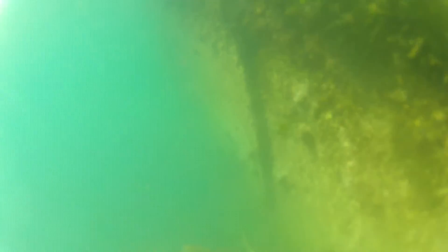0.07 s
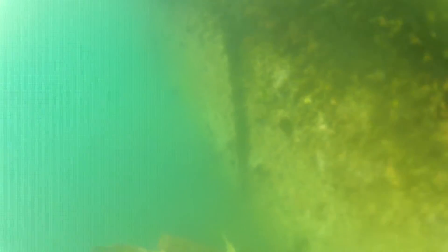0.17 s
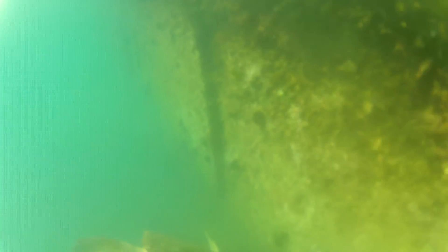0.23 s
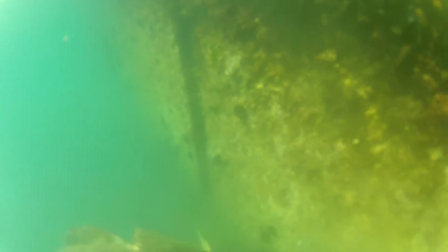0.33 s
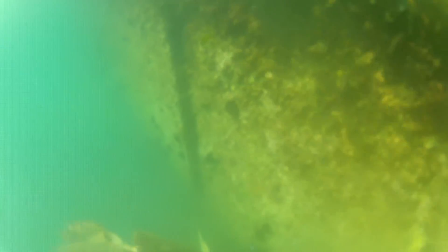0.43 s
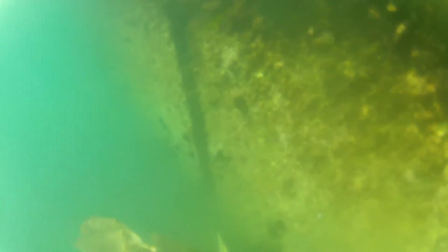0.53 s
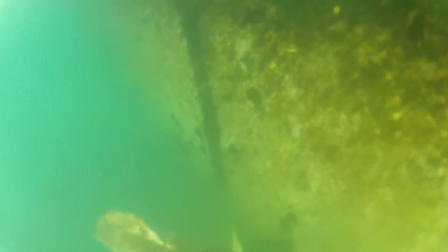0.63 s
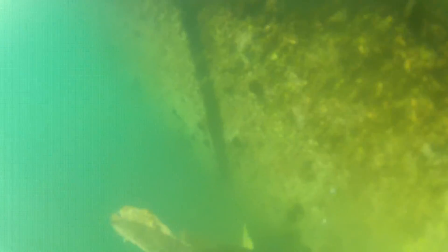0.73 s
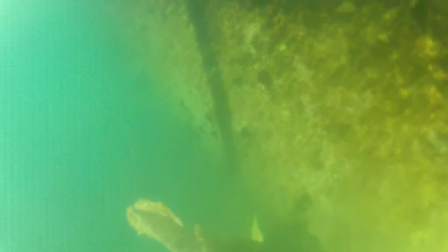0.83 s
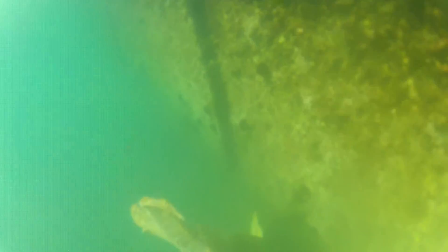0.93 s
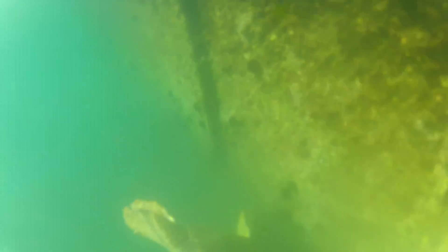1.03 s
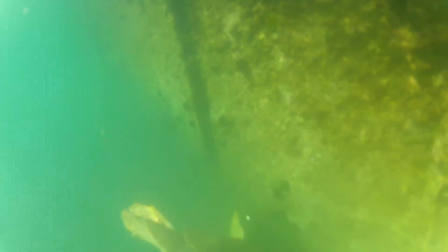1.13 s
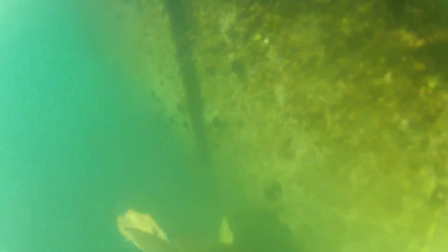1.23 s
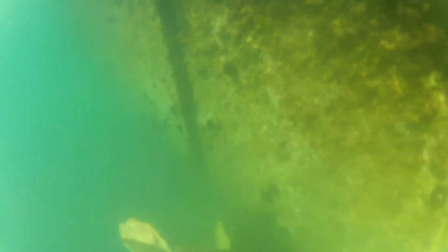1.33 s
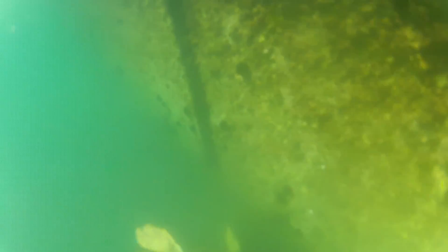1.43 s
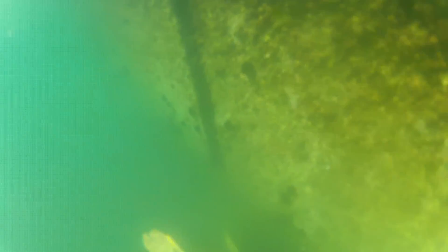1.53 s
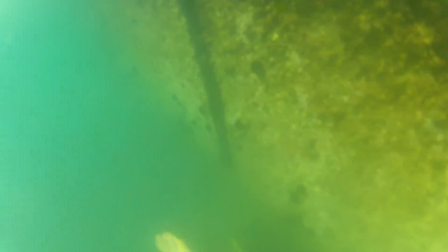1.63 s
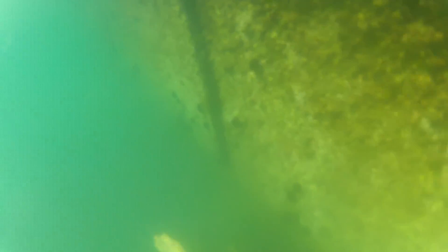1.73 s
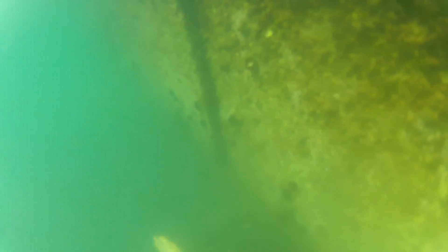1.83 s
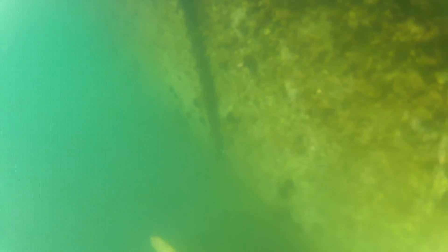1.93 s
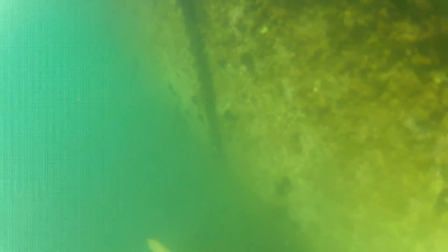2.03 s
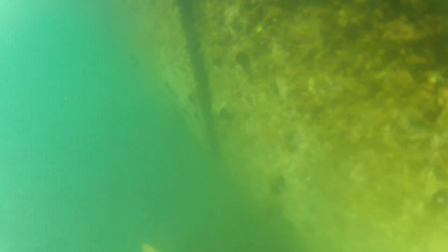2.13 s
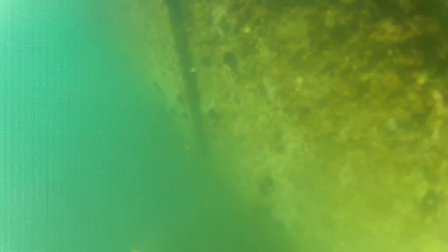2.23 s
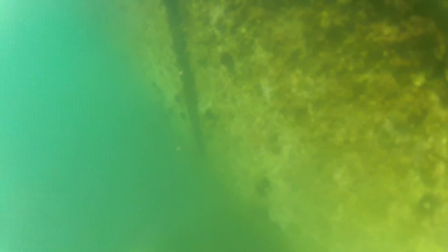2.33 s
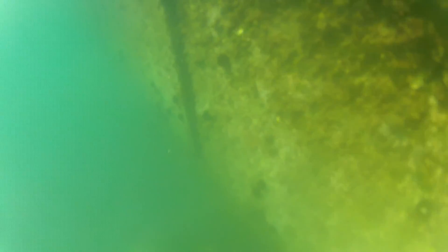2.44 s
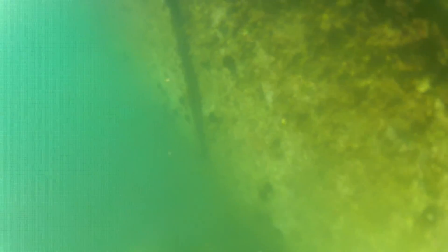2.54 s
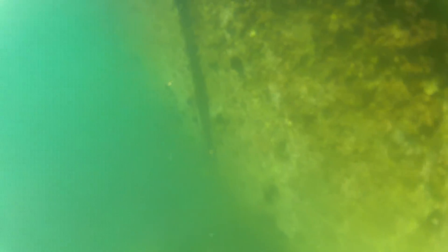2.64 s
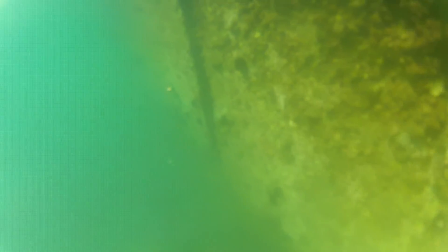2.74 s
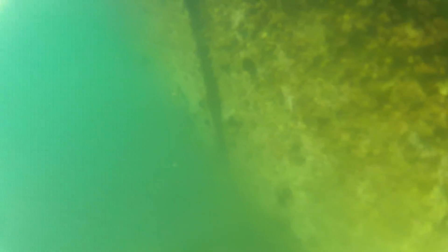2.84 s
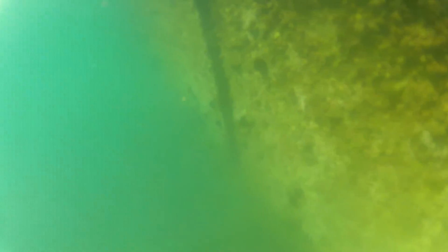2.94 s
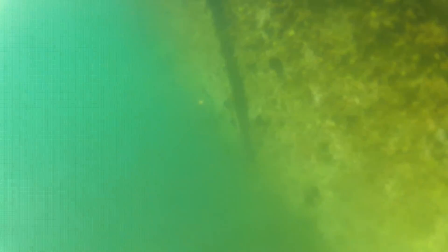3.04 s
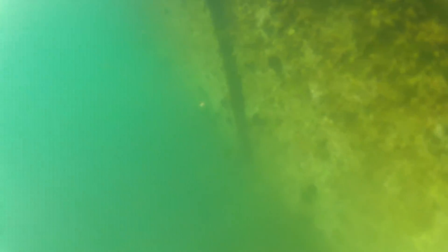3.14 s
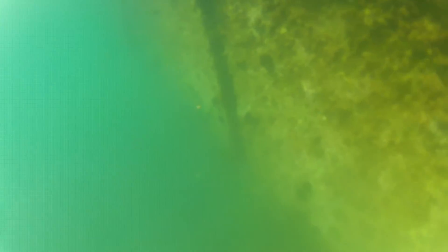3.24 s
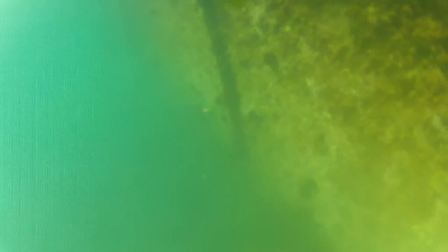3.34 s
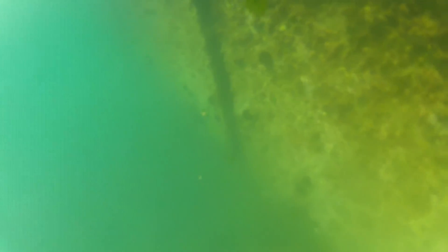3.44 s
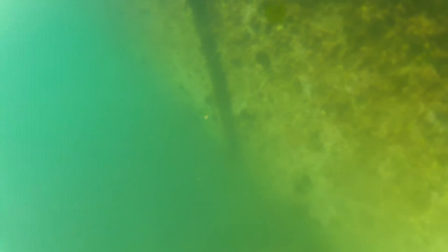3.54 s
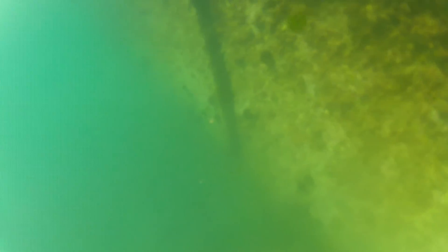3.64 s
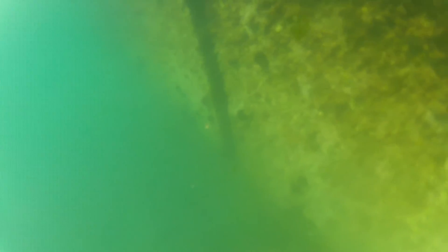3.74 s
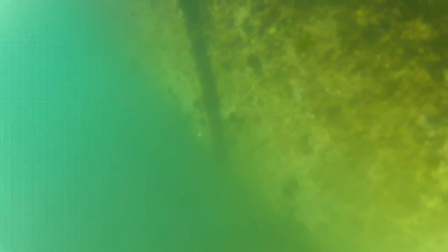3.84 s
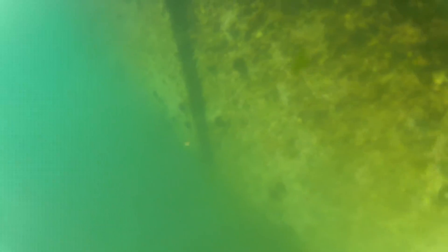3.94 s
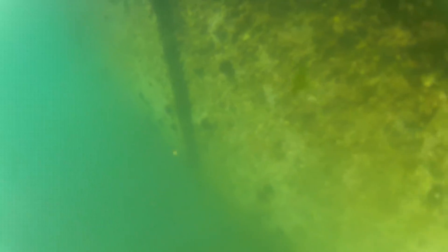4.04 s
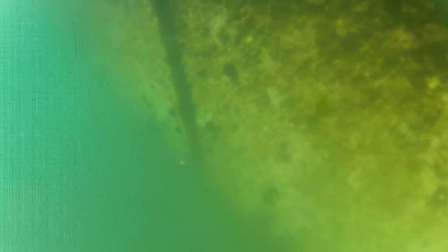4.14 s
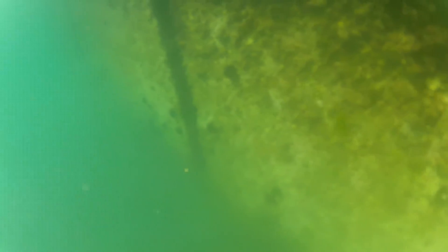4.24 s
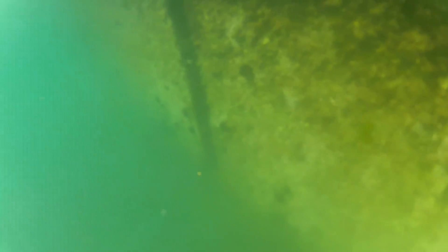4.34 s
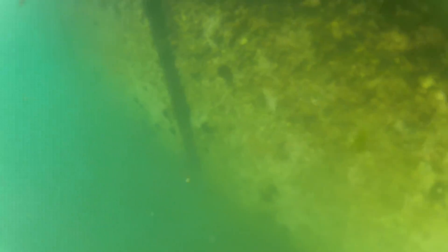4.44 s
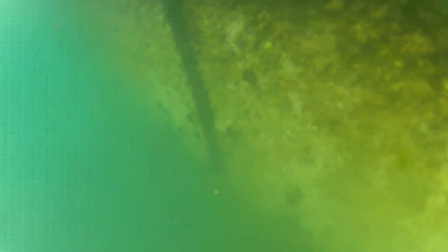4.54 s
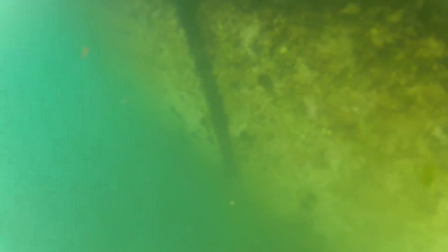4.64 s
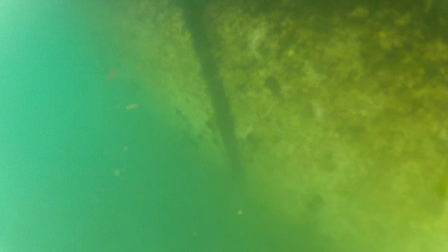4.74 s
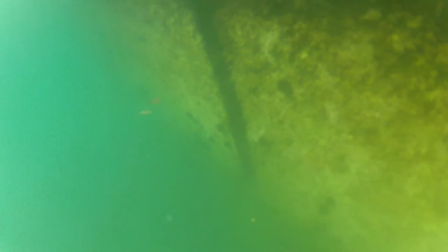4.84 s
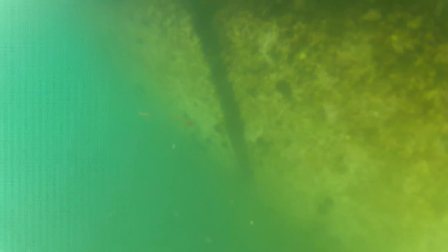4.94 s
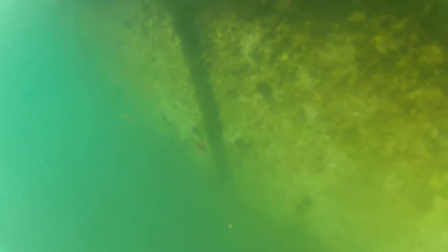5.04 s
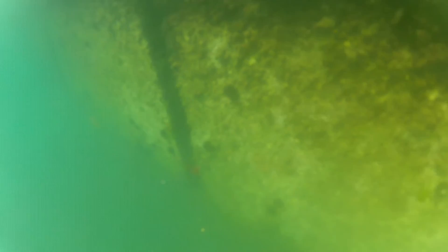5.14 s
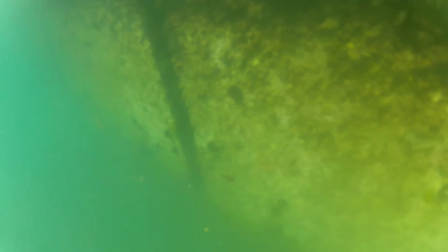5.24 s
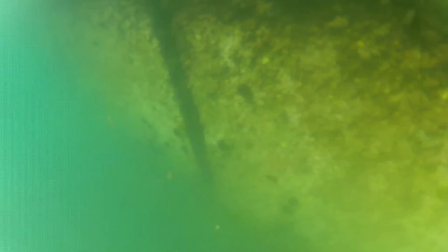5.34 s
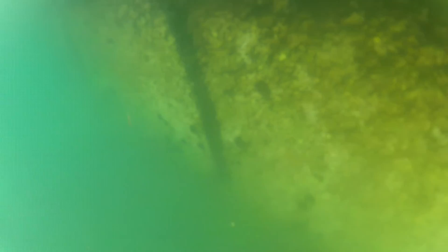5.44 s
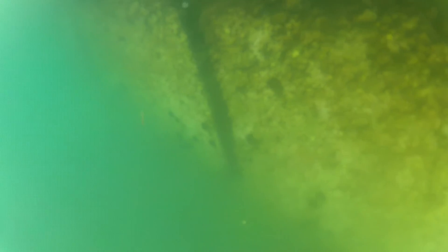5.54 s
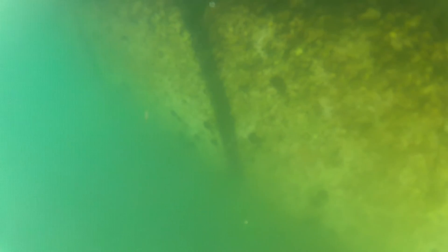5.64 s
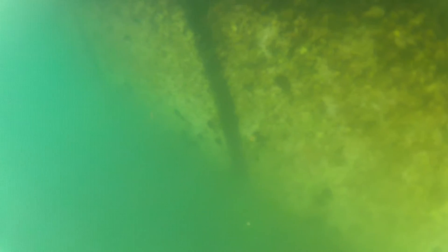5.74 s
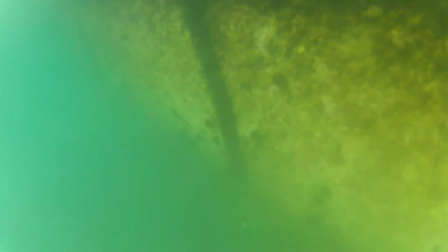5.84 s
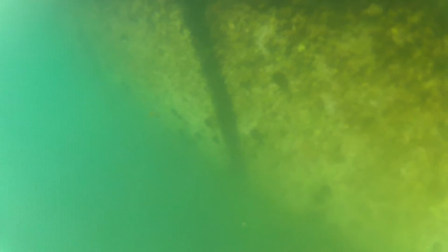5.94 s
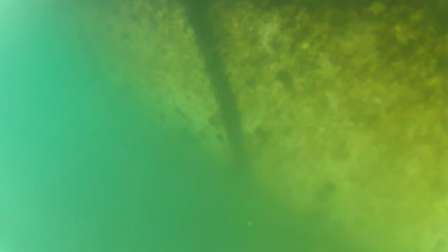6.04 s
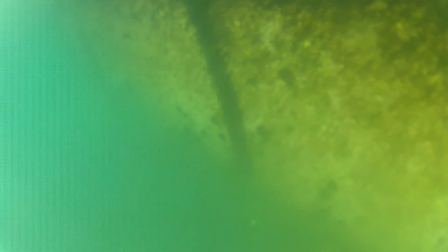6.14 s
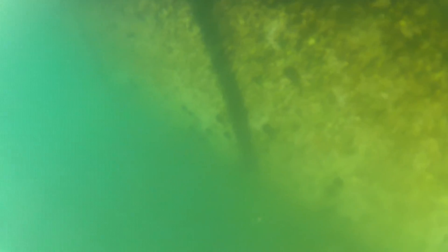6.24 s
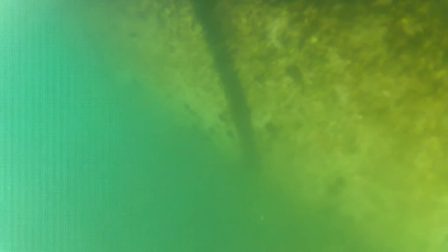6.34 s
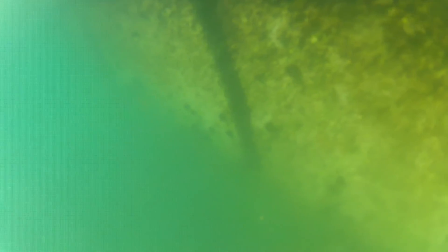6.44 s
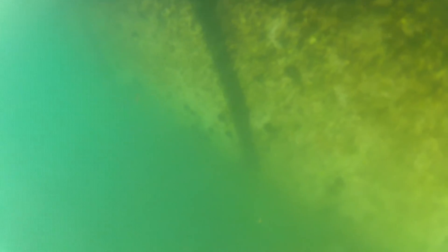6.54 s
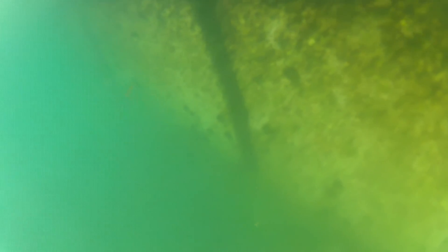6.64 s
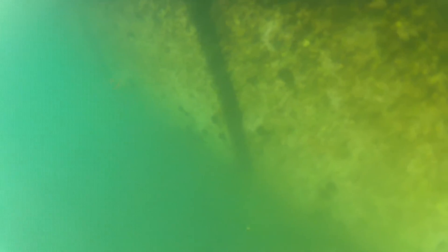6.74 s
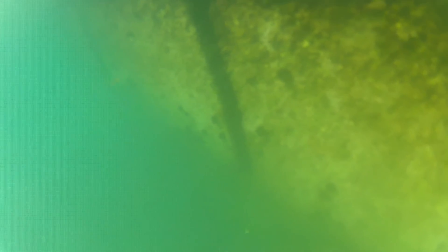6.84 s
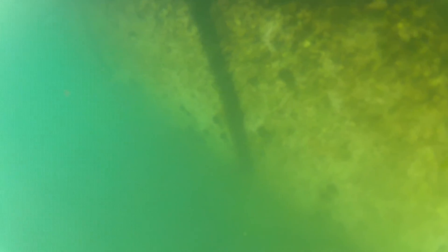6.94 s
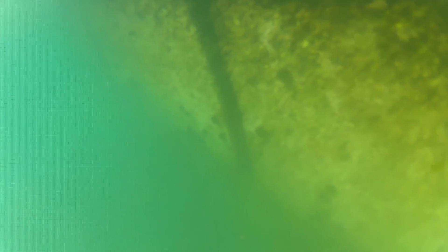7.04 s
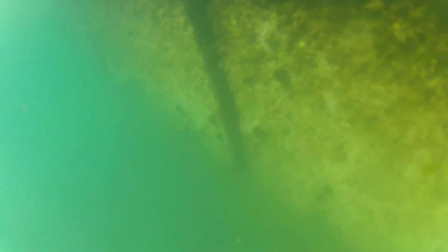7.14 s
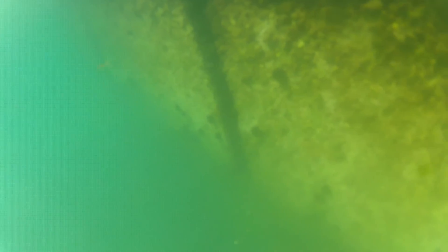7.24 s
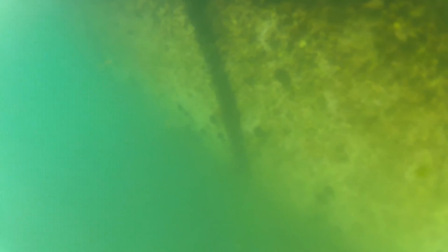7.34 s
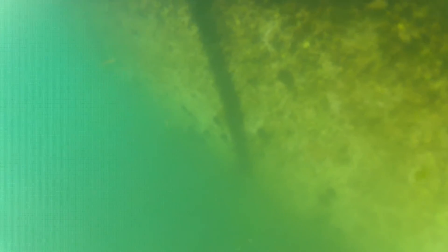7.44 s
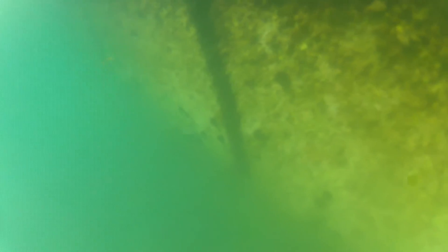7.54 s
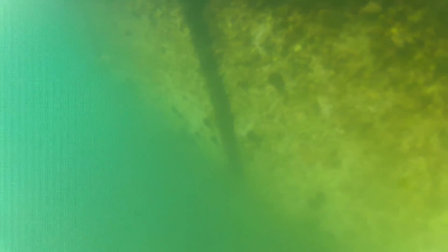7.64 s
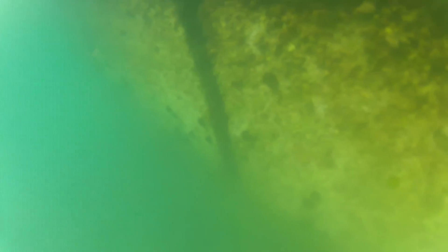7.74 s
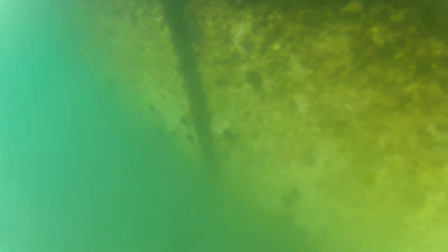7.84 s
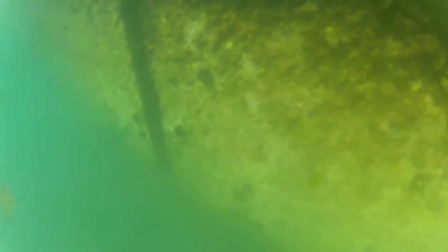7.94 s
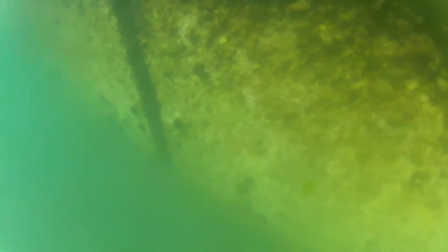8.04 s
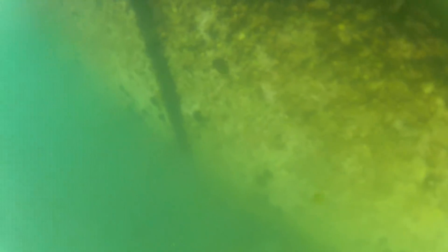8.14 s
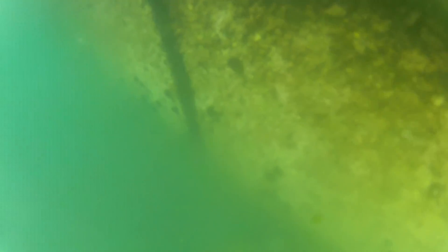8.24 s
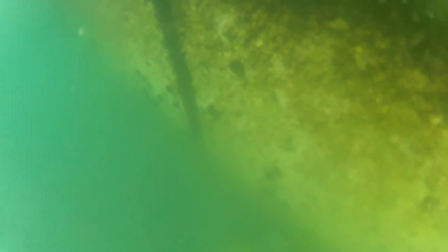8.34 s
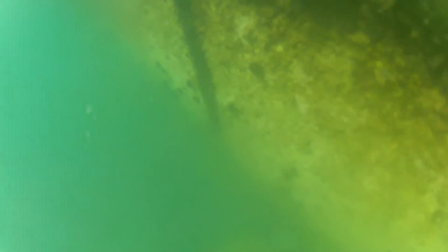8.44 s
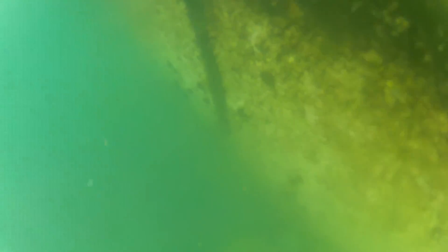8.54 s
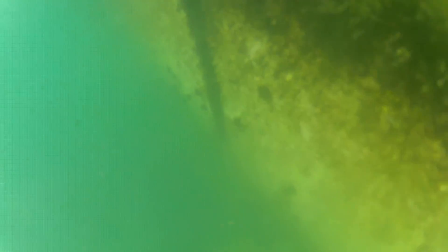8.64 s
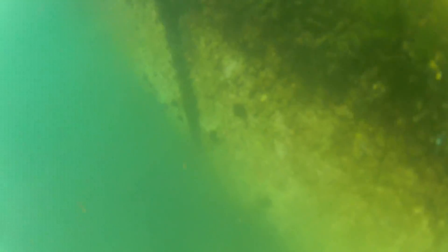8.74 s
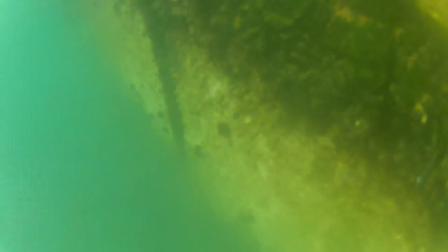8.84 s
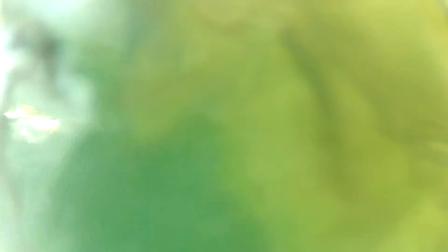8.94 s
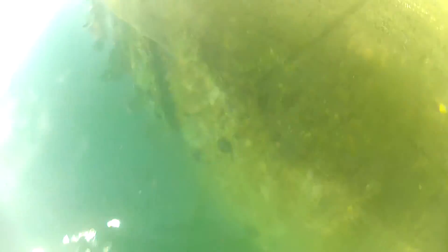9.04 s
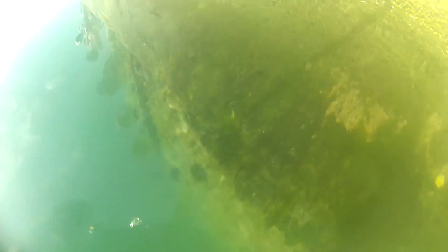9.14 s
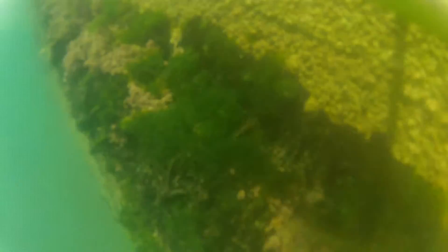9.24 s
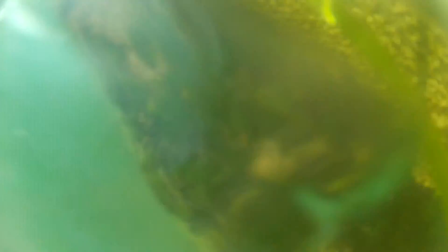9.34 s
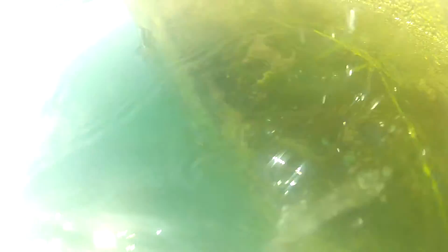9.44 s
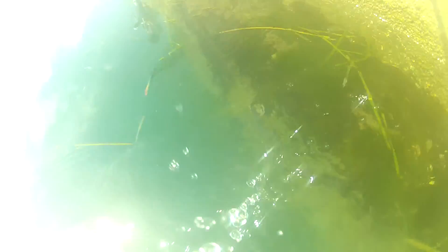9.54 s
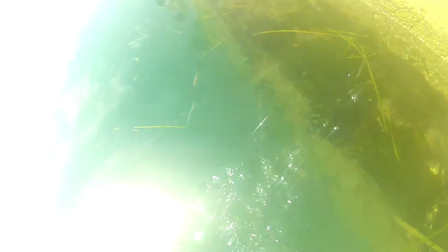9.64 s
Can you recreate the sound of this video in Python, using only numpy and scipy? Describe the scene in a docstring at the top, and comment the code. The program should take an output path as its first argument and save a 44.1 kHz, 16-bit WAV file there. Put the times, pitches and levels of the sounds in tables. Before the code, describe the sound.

Close and muffled inside a plastic housing under water: a low uneven rumble and thin hiss, with small clicks, grit-like ticks and an early short groan. Brighter sharp clicks come in clusters around three, four and nearly six seconds. The last second erupts into a far louder knock, thump, splash and bubbling froth as it breaks the surface.

```python
"""A small camera in a plastic housing drifts under water beside a rock wall.
From the start water rumbles past, the housing clicks, creaks and ticks, and pockets of air gulp; the shell
groans once at half a second. In the last second it is lifted through the surface in a splash of bubbles and froth.
Noise makes the water, struck resonances the housing, and decaying sines the air.
The converter samples slowly and holds each value, so the sound is mirrored into the treble."""
import sys
import numpy as np
from scipy.fft import rfft, irfft, next_fast_len
from scipy.io import wavfile
from scipy.ndimage import map_coordinates

SR = 44100
rng = np.random.default_rng(int(sys.argv[2]) if len(sys.argv) > 2 else 0)


def digitize_waveform(pressure):
    """Quantize a signal to 16-bit integers and store it at the path in sys.argv[1].

    Rows of a 2-D input are taken as channels; values are limited to [-1, 1].
    """
    field = np.atleast_2d(pressure).T
    bounded = np.clip(field, -1, 1)
    quanta = np.round(bounded * 32767).astype(np.int16)
    wavfile.write(sys.argv[1], SR, quanta)


N = 426888


def amp(db):
    """Decibel law: 20 dB is a factor of ten in amplitude."""
    return 10 ** (np.asarray(db) / 20)


def unit(x):
    """Normalisation by the root mean square."""
    return x / np.sqrt(np.mean(np.abs(x) ** 2) + 1e-20)


def along(points, at):
    """Interpolation of (f/Hz, value) points on a logarithmic frequency axis."""
    f, v = np.transpose(points)
    return np.interp(np.log(at + 1), np.log(f + 1), v)


def curves(rows):
    """Linear interpolation in time: one value per sample for each column after t/s."""
    s, *columns = np.transpose(rows)
    return [np.interp(np.arange(N) / SR, s, c) for c in columns]


def wobble(rate):
    """Band-limited random fluctuation: a smooth curve through rate knots a second."""
    knots = rng.standard_normal(int(N * rate / SR) + 4)
    return map_coordinates(knots, [np.arange(N) * rate / SR])


def filtered(x, response):
    """Linear filtering: the spectrum is multiplied by a complex response of frequency."""
    m = next_fast_len(N + SR // 2)
    f = np.fft.rfftfreq(m, 1 / SR)
    return irfft(rfft(x, m) * response(f), m)[..., :N]


def noise(spectrum):
    """Spectral shaping: coloured noise of rms 1."""
    return unit(filtered(rng.standard_normal(N), lambda f: amp(along(spectrum, f))))


def ringing(modes):
    """Modal superposition: causal resonances that pass white noise at unchanged power."""
    def response(f):
        h = 0
        for k, (centre, width, db) in enumerate(modes):
            resonance = 1j * f * width / (centre ** 2 - f ** 2 + 1j * f * width)
            h = h + (-1) ** k * amp(db) * resonance
        above = f / (1.68 * modes[-1][0])  # the damped plastic passes little above its highest mode
        h = h / (1 - above ** 2 + 1.2j * above) ** 2
        return unit(abs(h)) * np.exp(1j * np.angle(h))
    return response


def chirps(s, db, hz, rise, t60, glide, length):
    """Damped free oscillation: a sine per row, its pitch climbing by the share glide within t60."""
    t = np.arange(round(length * SR)) / SR
    s, db, hz, rise, t60 = (np.asarray(c)[:, None] for c in (s, db, hz, rise, t60))
    swell = np.sin(np.pi / 2 * np.clip(t / rise, 0, 1)) ** 2
    decay = amp(db - 60 * np.maximum(t - rise, 0) / t60)
    tone = decay * swell * np.sin(2 * np.pi * hz * t * (1 + glide * t / t60 / 2))
    at = np.round(s * SR).astype(int) + np.arange(len(t))
    return np.bincount(at.ravel(), tone.ravel(), N + SR)[:N]


def swells(rows):
    """Power summation of bell-shaped gains, each 23.7 dB under its peak one rise before and one fall after."""
    t = np.arange(N) / SR
    power = 0
    for s, db, rise, fall in rows:
        side = np.where(t < s, rise, fall)
        power = power + amp(2 * db - 47.4 * ((t - s) / side) ** 2)
    return np.sqrt(power)


# Passing water, mean levels: t/s, rumble level/dB, wash level/dB
WATER_FLOW = [(0.0, -41, -60), (0.35, -44.5, -58.5), (0.57, -46, -56.5), (0.91, -48.5, -60.5),
              (1.51, -47.5, -59), (1.86, -52.5, -61.5), (2.13, -53, -61), (2.26, -46.5, -59.5),
              (2.56, -59, -60), (2.91, -49.5, -59.5), (3.18, -57.5, -59.5), (4.31, -48.5, -60.5),
              (5.69, -52.5, -58), (5.85, -60.5, -61.5), (6.52, -53, -60.5), (7.06, -60.5, -60.5),
              (7.84, -54, -59), (8.17, -43.5, -57.5), (8.52, -42, -59.5), (8.74, -41.5, -57),
              (8.84, -35.5, -53), (9.27, -43.5, -57), (9.41, -45, -38.5), (9.68, -28.5, -51.5)]
# Relative noise spectra of the eddies' rumble, their wash and the far hiss: f/Hz, level/dB
RUMBLE_SPECTRUM = [(12, -34), (20, 4), (68, 0.5), (77, -15), (87, -22), (130, -22), (170, -65.5),
                   (290, -120)]
WASH_SPECTRUM = [(53, -24), (90, 1.5), (129, -0.5), (312, -6.5), (525, -16.5), (707, -18), (900, -30),
                 (1170, -65.5), (1980, -120)]
HISS_SPECTRUM = [(350, -14.5), (600, 3), (706, -3), (1210, -6), (1960, -9), (2380, -5), (2990, -8),
                 (5060, -12), (5900, -19), (7670, -51), (13000, -120)]
HISS_DB = -67.5  # mean level of the far hiss of the water


def water():
    """Turbulence noise: eddies rumble and wash on the housing in uneven lumps over a smooth hiss."""
    rumble_db, wash_db = curves(WATER_FLOW)
    rumble = amp(rumble_db + 2.2 * wobble(9)) * noise(RUMBLE_SPECTRUM)
    wash = amp(wash_db + 0.5 * wobble(25) + 0.53 * wobble(36)) * noise(WASH_SPECTRUM)
    hiss = amp(HISS_DB + 0.78 * wobble(30) + 1.0 * wobble(3.03)) * noise(HISS_SPECTRUM)
    return rumble + wash + hiss


# Modes of the whole shell: f/Hz, width/Hz, relative level/dB
SHELL_MODES = [(260.4, 46, 5), (464, 24, -7), (695, 18, -1.5), (1200, 91, -38), (1652, 46, -10),
               (2300, 100, -17), (3580, 210, -50.5)]
# The shell rubs on its mount: peak t/s, level/dB, rise/s, fall/s
RUB_SWELLS = [(.02, -62, 0.056, 0.04), (.24, -60.5, 0.27, 0.39), (.495, -41.5, 0.042, 0.053),
              (.74, -62.5, 0.073, 0.047), (2.5, -68.5, 0.13, 0.29), (3.2, -64.5, 0.27, 0.35),
              (3.878, -50, .015, 0.024), (4.548, -51, 0.022, 0.028), (4.9, -64, .04, 0.046),
              (5.2, -63, .12, 0.048), (7.98, -57, 0.059, 0.11), (8.07, -45, 0.061, 0.085),
              (9.3, -56, 0.067, 0.11), (9.63, -43.5, 0.079, 0.055), (8.78, -56, 0.05, .1)]
RUB_REST_DB = -70.5  # steady rubbing under the swells
# the two lowest shell modes sing once; lists follow the modes
GROAN_S, GROAN_DB, GROAN_RISE_S, GROAN_T60_S = .493, [-24, -36], [0.031, 0.0055], [0.1, 0.16]


def rubbing():
    """Stick-slip friction: uneven slips ring in the shell modes; once it catches and the shell groans."""
    slips = unit(amp(4 * wobble(60) + 1.5 * wobble(18)) * rng.standard_normal(N))
    friction = (swells(RUB_SWELLS) + amp(RUB_REST_DB)) * slips
    groan_hz = [mode[0] for mode in SHELL_MODES[:2]]
    groan = chirps([GROAN_S] * 2, GROAN_DB, groan_hz, GROAN_RISE_S, GROAN_T60_S, glide=0.019, length=.2)
    return filtered(friction, ringing(SHELL_MODES)) + groan


# The clearest faint ticks, before the housing rings: t/s, level/dB
CLEAR_TICKS = [(0.5556, -50), (0.8684, -59), (1.0455, -44.5), (1.0908, -51), (1.2336, -52), (1.3728, -56),
               (1.458, -56), (1.6342, -54), (1.679, -52.5), (1.7187, -55), (1.7898, -53), (2.059, -42.5),
               (2.1274, -43.5), (2.5376, -50), (2.947, -43), (3.008, -43), (3.5734, -48), (4.0894, -47.5),
               (4.151, -49.5), (4.9921, -48), (5.1367, -45), (5.3138, -44), (5.3666, -46.5),
               (6.0237, -53.5), (6.1185, -49.5), (6.4986, -49), (6.6273, -42), (6.8843, -52.5),
               (7.1134, -47), (7.17, -53), (7.4135, -55), (7.6904, -50), (7.7702, -52), (7.7887, -51.5),
               (7.9004, -41), (7.932, -44.5), (8.024, -48.5), (8.2084, -54), (8.9238, -38), (8.9745, -29),
               (9.1714, -56), (9.5284, -44)]
# Longer scrapes across the latch, before the housing rings: t/s, level/dB, t60/s
LATCH_SCRAPES = [(2.291, -42, 0.035), (2.312, -41, .09), (2.571, -49.5, 0.027), (3.661, -48, 0.045),
                 (6.307, -56, .04), (6.323, -52, 0.14), (8.968, -35, 0.026), (8.997, -40, 0.039),
                 (9.017, -11, 0.019), (9.033, -29, 0.034), (9.074, -28.5, 0.043), (9.106, -34.5, .03),
                 (9.125, -35, 0.047), (9.324, -33, .08), (9.516, -30.5, 0.034)]
STRAY_DB, STRAY_SPREAD_DB = -62, 2.4  # the many weak ticks: base level, spread per e-fold of random size
TICK_T60_S = 0.012  # median decay of a tick


def ticks(count=320):
    """Impulse excitation: ticks and scrapes, as of grit, clear and weak, ring mostly the latch."""
    when, size = rng.random((count, 2)).T
    clear_s, clear_db = np.transpose(CLEAR_TICKS)
    scrape_s, scrape_db, scrape_t60 = np.transpose(LATCH_SCRAPES)
    tick_t60 = TICK_T60_S * np.exp(0.37 * rng.standard_normal(len(clear_s) + count))
    t60 = np.append(scrape_t60, tick_t60)[:, None]
    s = np.concatenate([scrape_s, clear_s, when * N / SR])
    stray_db = STRAY_DB - STRAY_SPREAD_DB * np.log(size + .03)
    db = np.concatenate([scrape_db, clear_db, stray_db])

    t = np.arange(SR // 10) / SR
    envelope = amp(db[:, None] - 60 * t / t60) * (1 - np.exp(-t / (0.021 * t60)))
    taps = envelope * rng.standard_normal((len(s), len(t)))
    at = np.round(s * SR).astype(int)[:, None] + np.arange(len(t))
    side_db = 4.1 * rng.standard_normal((len(s), 1))  # nearer the door or nearer the buttons
    parts = ((0, LATCH_MODES + BUTTON_MODES[:1]), (-18 - side_db, DOOR_MODES), (-15 + side_db, BUTTON_MODES))
    out = np.zeros(N)
    for part_db, modes in parts:
        push = np.bincount(at.ravel(), (amp(part_db) * taps).ravel(), N + SR)[:N]
        out = out + filtered(push, ringing(modes))
    return out


# Housing modes, from the broad wall up to the small parts: f/Hz, width/Hz, relative level/dB
WALL_MODES = [(393, 180, -10.5), (700, 68, -2.5)]
DOOR_MODES = [(1106, 103, 0.5), (1310, 150, 4.6), (1860, 156, 6.2)]
LATCH_MODES = [(2220, 485, 0.3), (2524, 550, 0), (2933, 236, -1.5)]
BUTTON_MODES = [(3550, 176, -4.5), (3850, 320, 11), (4380, 750, 11), (4820, 1150, 7.5)]
# Clicks and slaps, nominal: t/s, blow level/dB, wall level/dB, brightness/dB, contact time scale/s
HOUSING_CLICKS = [(0.0065, -62, -52, -12, 0.0033), (0.0599, -55, -41, -17, 0.0014),
                  (0.1923, -59.5, -40, -13, 0.003), (0.262, -70, -58, -17, 0.0032),
                  (0.3122, -49.5, -38.5, -30.5, 0.0028), (0.3337, -52, -56, -13, 0.0043),
                  (0.3697, -55, -42.5, -24, 0.0022), (0.4073, -46, -50, -13, 0.0018),
                  (0.475, -65, -42, -20, 0.0025), (0.4996, -47, -40.5, -15.5, 0.0057),
                  (0.6, -56.5, -60, -24, 0.0028), (0.6377, -72, -50, -5, 0.0018),
                  (0.715, -63, -68, -14, 0.016), (0.7555, -58.5, -50, -22, 0.0036),
                  (1.0102, -57.5, -58, -5, 0.0038), (1.9106, -85, -55, 0, 0.0026),
                  (2.4734, -55.5, -49.5, -21, 0.0028), (2.5035, -45.5, -39.5, -4.5, 0.0013),
                  (2.6048, -69, -50, -7, 0.0045), (2.656, -51.5, -52, 1.5, 0.0022),
                  (2.7377, -56, -49, -1, 0.0053), (2.7551, -52.5, -32, 1, 0.002),
                  (2.806, -52, -40, 1.5, 0.0047), (2.8416, -63, -47, 6, 0.0021),
                  (2.91, -63, -47, 2, 0.0047), (2.9538, -48, -39, -1, 0.0057),
                  (2.9824, -37.5, -33.5, -2, 0.0014), (3.0265, -52.5, -54, 8, 0.001),
                  (3.0724, -55, -49, -1, 0.0021), (3.0899, -30.5, -27.5, -0.5, 0.0027),
                  (3.1304, -51, -50, 0, 0.0023), (3.1425, -30, -23.5, 3, 0.0022),
                  (3.873, -56, -40.5, -11, 0.0035), (4.2408, -30, -26, 2.5, 0.0019),
                  (4.2862, -52.5, -39, 0, 0.0038), (4.3176, -57, -53, 14, 0.012),
                  (4.3307, -29.5, -23.5, 0.5, 0.0016), (4.501, -66.5, -37, -35, 0.0018),
                  (4.518, -60.5, -36, -27, 0.0025), (4.542, -60.5, -50, -16, 0.0067),
                  (5.038, -59.5, -42.5, 1, 0.0021), (5.442, -76, -46, 16, 0.0021),
                  (5.4665, -48.5, -45.5, 7, 0.0019), (5.5123, -68, -47, 10, 0.0016),
                  (5.5437, -44.5, -36.5, 2.5, 0.0017), (5.605, -50, -33.5, 8, 0.0021),
                  (5.6994, -34.5, -28.5, 4, 0.0014), (5.7161, -41, -36.5, 7.5, 0.0057),
                  (5.7339, -30.5, -39, -4.5, 0.0064), (5.7419, -36, -25.5, 6.5, 0.002),
                  (5.8083, -68, -50.5, 3, 0.003), (7.4313, -65, -52.5, 1, 0.0036),
                  (7.496, -58, -53, -1, 0.0029), (7.633, -32, -30, 2, 0.0031), (7.669, -59, -44, 9, 0.0037),
                  (7.9566, -64, -55, -19, 0.0029), (7.9989, -61, -58, -16, 0.0025),
                  (8.0531, -61, -47, -22, 0.0091), (8.082, -67, -48, -16, 0.0029),
                  (8.2666, -57, -59, -2, 0.0031), (8.7093, -51, -45, -1.5, 0.0037),
                  (8.783, -37.5, -34, -9.5, 0.0018), (8.8068, -51.5, -48, 16, 0.0013),
                  (8.8266, -61.5, -61, 9, 0.0028), (8.849, -56, -55, 7, 0.012),
                  (8.866, -45, -41.5, -20, 0.00075), (8.9108, -54, -53, 3, 0.0031),
                  (8.9346, -31, -39, -10, 0.0017), (9.05, -28, -42, -5, 0.0014),
                  (9.0698, -27, -33, -4, 0.0016), (9.1113, -31.5, -59, -2, 0.0016),
                  (9.1635, -42.5, -63, 4.5, 0.00087), (9.2528, -30, -30.5, -11, 0.0027),
                  (9.288, -36, -49, -10, 0.0028), (9.2996, -24, -29, -3.5, 0.0014),
                  (9.3059, -19.5, -31, 11.5, 0.00073), (9.3093, -18.5, -26, 17, 0.00056),
                  (9.355, -30, -49, -4, 0.0035), (9.3988, -32, -29, -13, 0.0018),
                  (9.407, -45, -27, -7, 0.0015), (9.4324, -18.5, -39, -2, 0.002),
                  (9.4573, -27, -49, -18, 0.0014), (9.4705, -24.5, -46, -19.5, 0.001),
                  (9.4733, -17.5, -55, -6.5, 0.0056), (9.4823, -26, -53, -10, 0.0035),
                  (9.6188, -39, -58, -24, 0.014)]
LATCH_DB, DOOR_DB, BUTTONS_DB = -0.5, -6, -2  # each part against the blow level, at brightness 0
DOOR_DULLS, BUTTONS_BRIGHTEN = 0.66, 1  # share of the brightness that the door loses and the buttons gain
RATTLE_DB, RATTLE_T60_S = -17, 0.13  # ragged rattle after the blow


def housing():
    """Impact and modal response: a short rough push and ragged rattle shake each part at its own strength."""
    t = np.arange(SR // 8) / SR
    s, level_db, wall_db, bright_db, contact = (c[:, None] for c in np.transpose(HOUSING_CLICKS))
    latch_db = level_db + LATCH_DB
    door_db = level_db + DOOR_DB - DOOR_DULLS * bright_db
    buttons_db = level_db + BUTTONS_DB + BUTTONS_BRIGHTEN * bright_db

    u = t / np.clip(contact, .0007, .03)
    blow = u * np.exp(1 - 1.439 * u)
    knots = rng.standard_normal((len(s), 40))
    where = np.broadcast_arrays(np.arange(len(s))[:, None], t * 300)  # 300 knots a second
    ragged = map_coordinates(knots, where, order=1)
    rattle = amp(RATTLE_DB - 60 * t / RATTLE_T60_S + 3.3 * ragged) * (1 - np.exp(-u))
    force = blow + rattle
    rough = rng.standard_normal(force.shape)

    at = np.round((s - .0012) * SR).astype(int) + np.arange(len(t))
    f = np.fft.rfftfreq(2 * len(t), 1 / SR)
    out = np.zeros(N + SR)
    parts = ((latch_db, LATCH_MODES, 50), (wall_db, WALL_MODES, 0),
             (door_db, DOOR_MODES, 50), (buttons_db, BUTTON_MODES, 50))
    for db, modes, lag in parts:  # lag in samples: the wall gives first
        ring = irfft(rfft(force * rough, 2 * len(t)) * ringing(modes)(f))[:, :len(t)]
        # each ring carries the energy of its force envelope
        ring = ring * np.linalg.norm(force, axis=1, keepdims=True) / np.linalg.norm(ring, axis=1, keepdims=True)
        out = out + np.bincount(at.ravel() + lag, (amp(db) * ring).ravel(), N + SR)
    return out[:N]


# Gushes of froth over the housing: peak t/s, level/dB, rise/s, fall/s
FROTH_GUSHES = [(8.85, -62.5, .15, 0.28), (9.0, -59, 0.083, 0.18), (9.14, -57, 0.054, 0.018),
                (9.32, -30.5, 0.022, 0.05), (9.37, -49, .04, 0.033), (9.41, -33, .02, 0.023),
                (9.44, -38.5, .03, 0.026), (9.478, -25.5, 0.016, 0.018), (9.57, -50.5, .06, 0.13),
                (9.635, -42, 0.056, 0.048), (9.67, -37.5, 0.035, .04)]


def froth(count=1500):
    """Superposition of many bubble oscillations: a crowd of small short-lived bubbles over a thin rush."""
    start = FROTH_GUSHES[0][0] - 2 * FROTH_GUSHES[0][2]
    when, size = rng.random((count, 2)).T
    s = start + when * (N / SR - start)
    db = -4.5 * np.log(size + 0.005)
    hz = np.clip(1700 * np.exp(.4 * rng.standard_normal(count)), 700, 3300)
    crowd = chirps(s, db, hz, 2.0 / hz, 16 / hz, glide=0.45, length=.03)
    crowd = crowd / np.std(crowd[round(start * SR):])
    # relative spectrum: f/Hz, level/dB
    rush = noise([(500, -35.0), (900, 23), (2400, 6.5), (2900, 4), (4000, 9), (4500, -30), (5800, -27.0)])
    return swells(FROTH_GUSHES) * (crowd + amp(1.5 + 2.2 * wobble(70)) * rush)


# Air pockets and bubbles that ring: start t/s, nominal peak level/dB, starting f/Hz, t60/s
AIR_BUBBLES = [(0.059, -35.5, 135, 0.036), (0.635, -35.5, 254, 0.042), (.662, -42.5, 270, 0.12),
               (3.874, -41.5, 143, 0.13), (4.499, -28.5, 235, .053), (4.503, -31, 91.5, 0.078),
               (4.519, -31, 253, 0.045), (4.528, -36.5, 270, 0.081), (4.881, -42.5, 125, 0.093),
               (7.965, -35, 138, 0.045), (8.083, -37, 110, 0.12), (8.865, -35, 1500, 0.018),
               (8.912, -34.5, 1840, 0.018), (9.013, -3.5, 4220, 0.01), (9.014, -11.5, 988, 0.027),
               (9.018, 1, 2210, 0.012), (9.044, -24, 1430, 0.013), (9.052, -18.5, 5340, 0.0057),
               (9.055, -20, 1480, 0.016), (9.2572, -7.5, 146, 0.092), (9.26, 1, 66, .11),
               (9.266, -13, 296, 0.045), (9.274, -24.5, 49.8, 0.52), (9.31, 5, 3660, 0.0062),
               (9.31, -0.5, 2130, 0.0081), (9.309, -7.5, 179, 0.019), (9.325, -13, 2930, .021),
               (9.329, -14, 3830, 0.015), (9.33, -7, 2570, .0083), (9.337, -6, 2470, 0.018),
               (9.342, -7.5, 2800, 0.0096), (9.34, -18.5, 1194, 0.047), (9.357, -13.5, 4000, 0.01),
               (9.368, -14, 972, 0.054), (9.389, -33, 1830, .015), (9.399, -14.5, 1900, .024),
               (9.403, -21.5, 3470, .013), (9.41, -21, 4800, .0066), (9.426, -8.5, 1310, 0.026),
               (9.435, -9, 1090, 0.024), (9.459, -12, 1305, 0.027), (9.468, -20, 1240, .021),
               (9.469, -8.5, 2747, 0.046), (9.484, -18, 5570, 0.004), (9.485, -2.5, 3490, 0.01),
               (9.491, -19, 3800, 0.0091), (9.516, -25.5, 2080, 0.02), (9.54, -15.5, 147, 0.017),
               (9.579, -27, 131, 0.049), (9.619, -26.5, 282, 0.18), (9.664, -27.5, 2020, .041)]
RISE_1K_S, RISE_POWER = 0.0013, 0.41  # a bubble's attack at 1 kHz; larger, lower ones start more slowly


def bubbles():
    """Volume resonance: air pockets ring at a slightly climbing pitch; churning water roughens small ones."""
    s, db, hz, t60 = np.transpose(AIR_BUBBLES)
    rise = RISE_1K_S * (1000 / hz) ** RISE_POWER

    def tones(pick):
        chosen = [c[pick] for c in (s, db, hz, rise, t60)]
        return chirps(*chosen, glide=0.037, length=.2)

    return tones(hz < 500) + amp(1.7 * wobble(450)) * tones(hz >= 500)


def scene():
    """Linear superposition of all the sources, as one channel."""
    return (water() + rubbing() + ticks() + housing() + froth() + bubbles())[None]


HOLD_HZ, TOP_HZ = 12000, 16400  # rate of the slow sampling; upper band limit


def record(dry):
    """Sampling and zero-order hold: anti-alias filter, saturation, mirrored copies, then the band limit."""
    def anti_alias(f):
        return np.sin(np.pi / 2 * np.clip((HOLD_HZ / 2 + 60 - f) / 700, 0, 1))

    def hold_and_limit(f):
        hold = np.sinc(f / HOLD_HZ)  # the hold dulls the copies
        return hold * (f < TOP_HZ) / np.sqrt(1 + (f / 15500) ** 40)

    smooth = filtered(dry, anti_alias)
    smooth = smooth / (1 + abs(smooth / .83) ** 4) ** (1 / 4)  # the input stage saturates
    comb = 1 + 2 * np.cos(2 * np.pi * HOLD_HZ * np.arange(N) / SR)  # sampling copies the band around the rate
    return filtered(smooth * comb, hold_and_limit)


dry = scene()
out = record(dry)
digitize_waveform(out)
```